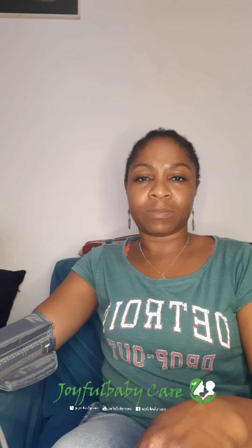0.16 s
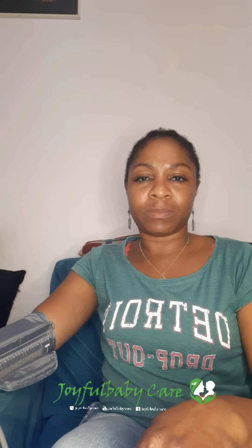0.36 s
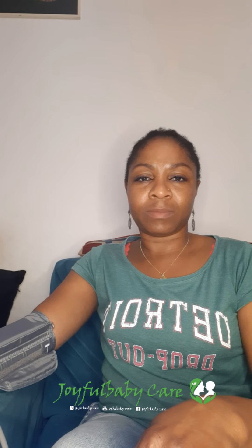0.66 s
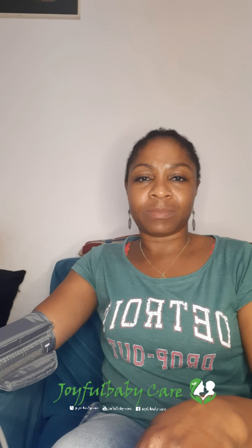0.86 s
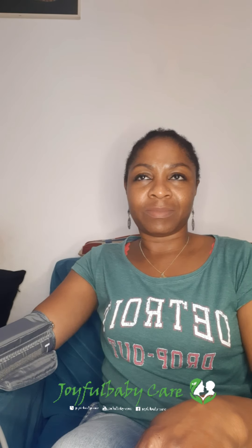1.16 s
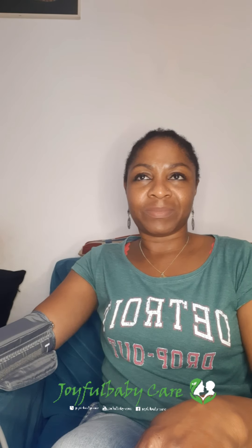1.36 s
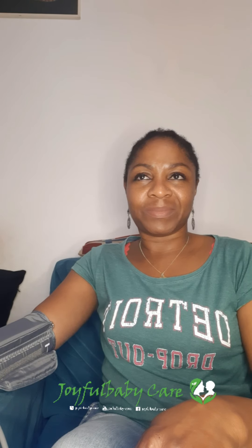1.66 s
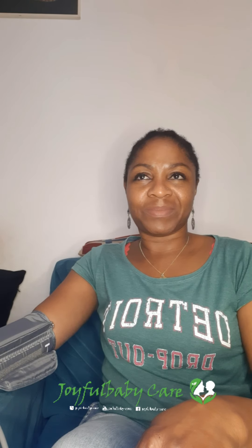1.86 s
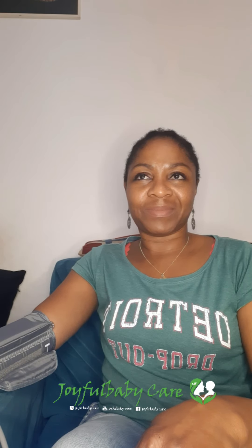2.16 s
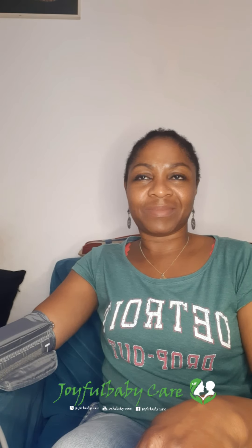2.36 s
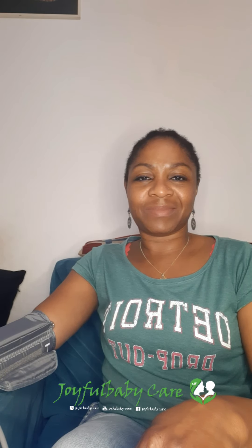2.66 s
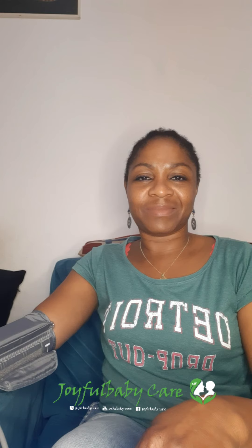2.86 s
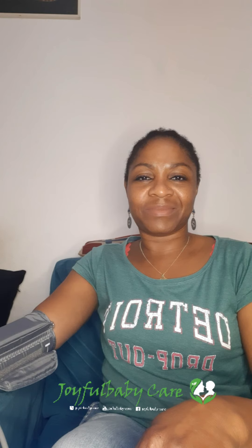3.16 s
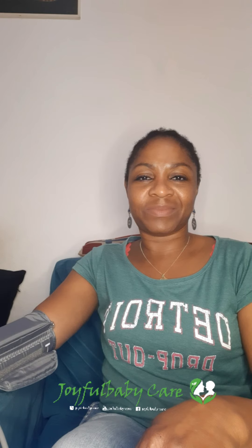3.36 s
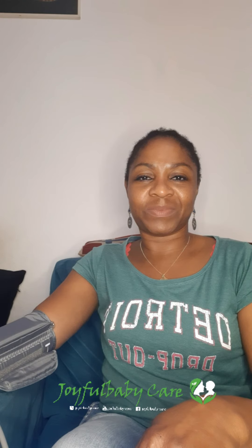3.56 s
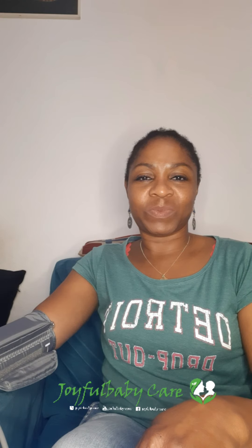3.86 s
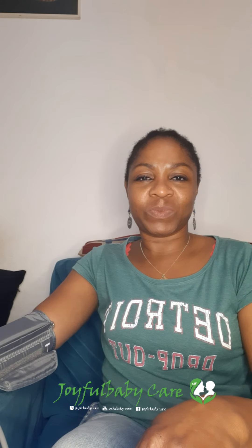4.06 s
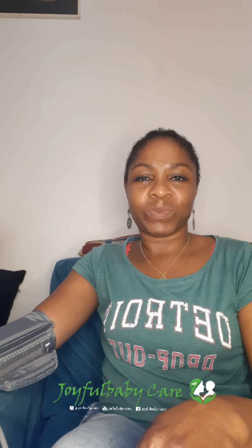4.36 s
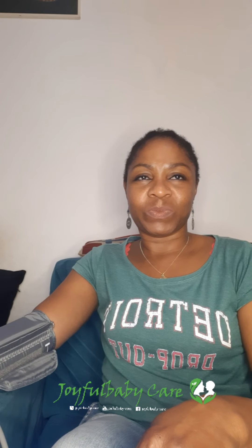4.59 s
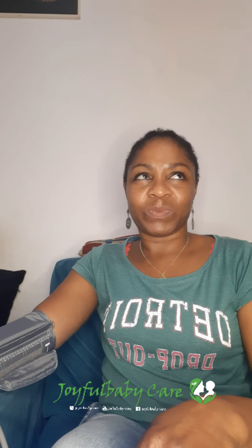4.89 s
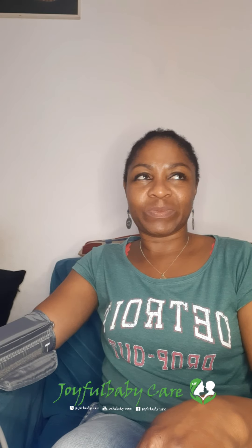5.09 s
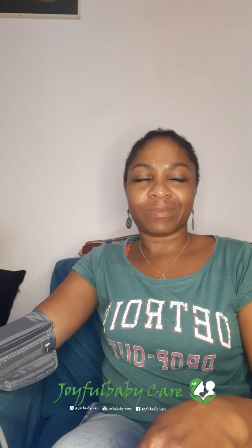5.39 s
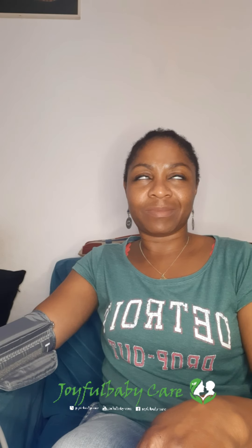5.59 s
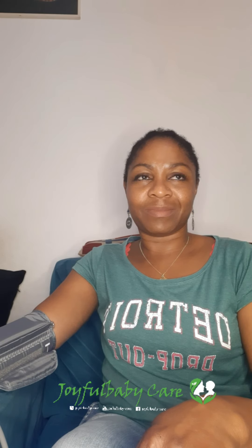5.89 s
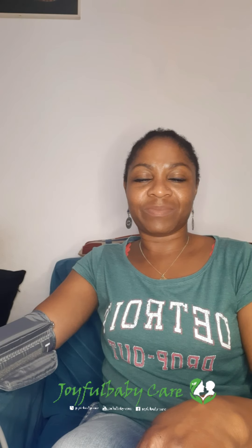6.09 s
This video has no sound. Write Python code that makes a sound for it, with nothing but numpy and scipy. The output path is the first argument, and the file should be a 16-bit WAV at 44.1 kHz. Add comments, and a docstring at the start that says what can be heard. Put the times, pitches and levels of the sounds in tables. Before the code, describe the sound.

A small air pump buzzes steadily close by, sagging slightly in pitch as a cuff fills, then cuts off with a valve knock into quiet room hiss.

```python
"""A quiet room: a small diaphragm air pump inflates an arm cuff close to the right microphone of a phone.
Hum orders, valve flap, brush ticks, bearing whine and hiss follow one shaft, which slows as pressure builds.
Then the power is cut, the pump runs down and a valve knocks; ringing noise bursts make all the small blows.
Coloured noise makes the room's rumble and hiss, which stay. The left microphone is shadowed by the phone
and hears the pump late."""
import sys
import numpy as np
from scipy import signal
from scipy.fft import rfft, irfft, next_fast_len
from scipy.io import wavfile
from scipy.ndimage import map_coordinates

SR = 44100
rng = np.random.default_rng(int(sys.argv[2]) if len(sys.argv) > 2 else 0)


def persist_wave(psi):
    """Save psi, clipped to +-1, as 16-bit WAV."""
    counts = np.round(np.clip(psi, -1, 1) * 32767).astype(np.int16)
    wavfile.write(sys.argv[1], SR, np.atleast_2d(counts).T)


def ratio(d):
    """dB to gain"""
    e = np.asarray(d, float) / 20
    return 10 ** e


N = 274743  # samples


def unit(x):
    """Scaled to rms 1."""
    return x / np.sqrt(np.mean(x ** 2) + 1e-20)


def along(points, hz, column=1):
    """Values of a table read on a log-frequency axis."""
    p = np.transpose(points)
    return np.interp(np.log(hz + 1), np.log(p[0] + 1), p[column])


def wobble(rate):
    """A smooth random curve, rate knots a second."""
    knots = rng.standard_normal(int(N * rate / SR) + 4)
    return map_coordinates(knots, [np.arange(N) * rate / SR])


def bumps(rows):
    """A sum of brief bell-shaped rises or dips (time [s], height, width [s])."""
    t = np.arange(N) / SR
    return sum(height * np.exp(-((t - s) / width) ** 2) for s, height, width in rows)


def filtered(x, response):
    """x times a complex response of frequency."""
    m = next_fast_len(N + SR // 2)
    return irfft(rfft(x, m) * response(np.fft.rfftfreq(m, 1 / SR)), m)[..., :N]


def modes(table):
    """Causal response of a set of resonances, neighbours in opposite sign."""
    def response(f):
        return sum((-1) ** k * ratio(db) * 1j * f * width / (centre ** 2 - f ** 2 + 1j * f * width)
                   for k, (centre, width, db) in enumerate(table))
    return response


# room noise at the two microphones: (frequency [Hz], left level [dB per Hz], right level [dB per Hz]);
# the lows keep only this shape, their level is set by rumble_db
ROOM_NOISE = [(29.81, -100, -102), (40.6, -106.5, -105), (56.6, -80, -80.5), (75, -88.5, -93),
              (100.5, -90, -88), (190, -104, -105), (626, -107, -103), (1018.7, -106, -103),
              (1341.2, -107, -100), (1710, -116, -113), (3366, -122, -121), (4763, -123, -120),
              (4910, -124, -107), (6140, -127, -111), (6200, -130, -121), (7570, -130, -115),
              (8440, -131, -133), (9940, -128, -126), (11370, -123, -116), (14100, -118, -110),
              (15700, -116, -112)]
# likeness of the noise at the two microphones: (frequency [Hz], correlation [-1 to 1])
LIKENESS = [(60, 0.98), (240, 0.85), (950, -0.26), (3770, -0.074), (15000, -0.046)]
# swells of the rumble: (time [s], rise [dB], width [s])
RUMBLE_SWELLS = [(2.1, 9, .06), (3.1, 7.5, 0.24), (4.2, 5.5, 0.17), (4.86, 4, 0.046), (5.2, 2.5, 0.24),
                 (5.93, 9, 0.052)]


def room():
    """Nearly steady hiss and a swelling rumble, alike at both microphones only in the bass."""
    def shares(f):
        angle = np.arccos(np.clip(along(LIKENESS, f), -1, 1)) / 2
        return np.array([np.cos(angle), np.sin(angle)])

    def colour(f):
        return ratio([along(ROOM_NOISE, f, column=1), along(ROOM_NOISE, f, column=2)]) * np.sqrt(SR / 2)

    mid, side = filtered(rng.standard_normal((2, N)), shares)
    air = filtered(np.array([mid + side, mid - side]), colour)
    low = filtered(air, lambda f: 1 / (1 + (f / 135) ** 8))
    _, drive_db, _ = shaft()
    # the rumble is 6.5 dB stronger while the pump runs
    rumble_db = -67.5 + 6.5 * ratio(drive_db) + bumps(RUMBLE_SWELLS) + 2.4 * wobble(6)
    hiss_swell = ratio(0.6 * wobble(2.5))
    return (air - low) * hiss_swell + ratio(rumble_db) * unit(low)


# how fast the room's answer dies: (frequency [Hz], t60 [s])
WALL_DECAY = [(200, 0.55), (1000, 0.67), (2500, 0.19), (12000, 0.024)]


def walls(x):
    """The room's answer, noise in which each frequency dies at its own speed, different on the two sides."""
    hz, t, z = signal.stft(rng.standard_normal((2, SR // 2)), SR, nperseg=256)
    decay = ratio(-60 * t / along(WALL_DECAY, hz)[:, None])
    tail = signal.istft(z * decay, SR, nperseg=256)[1]
    late = np.pad(x, (200, 0))  # samples until the walls answer
    return signal.fftconvolve(late[None], tail / np.linalg.norm(tail[0]), axes=1)[:, :N]


# blows of each kind: (time [s], peak level at the right microphone [dB])
VALVE = [(3.804, -45), (3.817, -39), (3.848, -46)]
FIZZ = [(1.51, -66), (2.681, -54)]
TICK = [(4.731, -55)]
BLIP = [(6.191, -64.5)]
# resonances of each kind, passed twice: (frequency [Hz], width per pass [Hz], level per pass [dB])
VALVE_RING = [(615, 110, 0), (1400, 1100, -12)]
FIZZ_RING = [(11800, 3400, 0)]
TICK_RING = [(1250, 1100, 0), (2550, 300, -1)]
BLIP_RING = [(980, 70, 0)]


def knocks():
    """Short decaying noise bursts, each kind ringing its own resonances."""
    # (blows, resonances, t60 of the burst [s], left level relative to right [dB])
    kinds = [(VALVE, VALVE_RING, 0.04, -9), (FIZZ, FIZZ_RING, 0.11, 3),
             (TICK, TICK_RING, 0.022, -11), (BLIP, BLIP_RING, 0.08, -5)]
    out = np.zeros((2, N + SR))
    t = np.arange(SR // 8) / SR
    hz = np.fft.rfftfreq(SR // 2, 1 / SR)
    for rows, ring, t60, left_db in kinds:
        for s, peak_db in rows:
            burst = ratio(-60 * t / t60) * rng.standard_normal(len(t))
            blow = irfft(rfft(burst, SR // 2) * modes(ring)(hz) ** 2)[:len(t)]
            gain = ratio(peak_db + np.array([[left_db], [0]]))
            out[:, round(s * SR):][:, :len(t)] += gain * blow / abs(blow).max()
    return out[:, :N]


# the load changes for a moment and the shaft spurts or dips: (time [s], gain [turns per s], width [s])
SPURTS = [(0.0, 0.4, 0.071), (.26, 0.42, 0.046), (.53, 0.32, 0.049), (.87, 0.21, 0.086),
          (1.22, -.25, 0.0405), (1.305, 0.97, .045), (1.9, 0.19, .1), (2.45, .3, .12), (2.75, .12, .3),
          (3.42, 0.28, 0.061), (3.66, 0.37, .05)]


def shaft():
    """Speed [turns per s], drive [dB] and cuff pressure (0 slack, 1 tight): the load slows the motor."""
    free_hz, loaded_hz, sag_s = 54.44, 49.11, 3.1  # turns per s, turns per s, time constant
    cut_s = 3.797  # the power is cut
    t = np.arange(N) / SR
    coast = np.maximum(t - cut_s, 0)
    speed = loaded_hz + (free_hz - loaded_hz) * np.exp(-t / sag_s) + bumps(SPURTS)
    speed = speed - 245 * coast  # braking, turns per s lost each second
    drive_db = -138 * coast - 2800 * coast ** 2
    pressure = np.minimum(t / cut_s, 1)
    return np.maximum(speed, 1), np.maximum(drive_db, -200), pressure


def strikes(turns, places, scatter_db):
    """Impulses at fixed places (share of a turn, level [dB]) of every turn, set between samples."""
    place, db = np.transpose(places)
    whole = np.arange(1, int(turns[-1]))[:, None]
    at = np.interp(whole + place, turns, np.arange(N)).ravel()
    size = ratio(db + scatter_db * rng.standard_normal((len(whole), len(place)))).ravel()
    # windowed sinc around each fractional sample
    taps = np.floor(at)[:, None] + np.arange(-7, 9)
    offset = taps - at[:, None]
    kernel = np.sinc(offset) * np.cos(offset * np.pi / 17) ** 2
    return np.bincount(taps.astype(int).ravel(), (kernel * size[:, None]).ravel(), N + 16)[:N]


# air and brush hiss, also the tilt of the whine: (frequency [Hz], level [dB per Hz])
HISS = [(120, -105), (240, -89), (400, -86), (800, -92), (1050, -90), (1450, -93), (1700, -97),
        (2900, -100), (3250, -106), (4900, -103), (7600, -105), (8200, -124), (8800, -128), (9300, -112),
        (11500, -103), (15600, -107)]


def air_hiss(turns):
    """Air and brush noise that puffs three times a turn."""
    puff = unit(1 + 0.16 * np.cos(2 * np.pi * 3 * (turns - 0.27)))
    return filtered(puff * rng.standard_normal(N), lambda f: ratio(along(HISS, f)) * np.sqrt(SR / 2))


# resonances of the motor can: (frequency [Hz], width [Hz], relative level [dB])
MOTOR_CAN = [(3190, 260, -24), (4010, 65, -0.5), (4900, 36, 2), (5120, 190, 0), (5710, 180, 2.5),
             (5960, 170, 0), (6260, 250, 1), (6960, 330, -5), (7620, 580, -2)]


def bearing_whine(turns):
    """The same small flaws of shaft and bearing pass on every turn: thin lines at high orders."""
    t = np.arange(N) / SR
    flaws = strikes(turns, rng.random((40, 2)) * [1, -6], scatter_db=1)
    ringing = filtered(flaws, lambda f: modes(MOTOR_CAN)(f) * ratio(along(HISS, f)) * (f > 2900))
    level_db = -64.5 - 0.16 * t + 1.4 * wobble(2.42)
    return ratio(level_db) * unit(ringing)


# three commutator segments, each with a make and a weaker break: (place [share of a turn], relative level [dB])
BRUSH = [(.03, -6), (.25, 0), (.38, -6), (.59, 0), (.7, -4), (.92, -2)]


def brush_ticks(turns):
    """Brushes make and break contact with the segments, a treble tick each time."""
    ticks = strikes(turns, BRUSH, scatter_db=1.5)
    ring = modes([(11400, 1200, 0)])
    return ratio(-71.5) * unit(filtered(ticks, lambda f: ring(f) ** 2 * (f > 9000)))


# the flap's slap and its rebounds: (place [share of a turn], relative level [dB])
FLAP = [(.052, 0), (.174, -7), (.456, -12), (.86, -10)]
# housing modes rung by the flap: (frequency [Hz], width [Hz], relative level [dB])
HOUSING = [(1762, 156, 0), (1981, 69, 7), (2160, 240, -4.5), (2466, 130, -3.5), (2556, 43, 6.5),
           (2676, 305, 5), (2962, 310, -6)]


def valve_flap(turns):
    """The flap slaps and rebounds on every turn and rings the housing."""
    slaps = strikes(turns, FLAP, scatter_db=0.5)
    return ratio(-56) * unit(filtered(slaps, lambda f: modes(HOUSING)(f) * (f > 1640)))


# hum orders before standing waves and waver:
# (multiple of the shaft, level with the cuff slack [dB], level with it tight [dB])
HUM = [(1, -61, -62), (2, -67, -64), (3, -58, -55), (4, -75, -79), (5, -59, -61), (6, -57, -50),
       (7, -58, -67), (8, -48, -59), (9, -61, -50), (10, -49, -61), (11, -57, -70), (12, -56, -60),
       (13, -59, -60), (14, -60, -54), (15, -51, -43), (16, -55, -67), (17, -60, -52), (18, -55, -61),
       (19, -51, -69), (20, -68, -62), (21, -54, -58), (22, -59, -58), (23, -58, -58), (24, -41, -68),
       (25, -60, -52), (26, -60, -60), (27, -53, -60), (28, -77, -44), (29, -75, -66), (30, -74, -67),
       (31, -66, -71), (32, -72, -69)]
# standing waves of the room that the orders slide across: (frequency [Hz], width [Hz], gain [dB])
STANDING = [(477, 8, -9.8), (513, 40, 10.5), (627, 24, 9.4), (756, 14, -16.4), (783, 8, -4.5),
            (828, 14, -14.3), (939, 40, -9.7), (1107, 24, -11.5), (1173, 14, -6.1), (1302, 24, -11.6),
            (1425, 14, -9.0), (1452, 40, -12.6), (1500, 40, 10.0), (1548, 40, 10.4)]


def order_lag(k):
    """Phase lag [turns of the order's own cycle] that shapes the pulse within a turn."""
    if k < 19:  # higher orders come later in the stroke, which spreads the pulse over the turn
        return 0.461 * k + 0.0535 * k * k
    # the upper orders bunch into three strokes a turn, the strongest as the valve opens near its end
    return 0.89 * k - 0.005 * (k - 25) ** 2 + 0.19 * np.sin(2 * np.pi * k / 3)


def shaft_hum(turns, speed, pressure):
    """Harmonics of the shaft, each sliding from its slack to its tight level and across standing waves."""
    t = np.arange(N) / SR
    step = slice(None, None, 256)  # standing-wave gain is worked out on a coarse grid
    hum = np.zeros(N)
    for k, slack_db, tight_db in HUM:
        f = k * speed[step]
        standing_db = sum(db / (1 + (2 * (f - centre) / width) ** 2) for centre, width, db in STANDING)
        standing = np.interp(t, t[step], ratio(standing_db))
        level_db = slack_db + (tight_db - slack_db) * pressure + 0.4 * wobble(3.03)
        wave = np.cos(2 * np.pi * (k * turns - order_lag(k)))
        hum += np.sqrt(2) * ratio(level_db) * standing * wave
    return hum


def pump():
    """Hum and rattle, locked to one shaft; the hum fades faster than the rest in the run-down."""
    speed, drive_db, pressure = shaft()
    turns = np.cumsum(speed) / SR
    hum = shaft_hum(turns, speed, pressure)
    rattle = valve_flap(turns) + brush_ticks(turns) + bearing_whine(turns) + air_hiss(turns)
    return ratio(1.12 * drive_db) * hum, ratio(drive_db) * rattle


# the phone shadows the left microphone: (frequency [Hz], gain [dB])
SHADOW = [(55, -21), (160, -13), (300, -7), (950, -11.5), (1500, -6.5), (1750, -14), (2600, -12.5),
          (3050, -21.5), (3800, -9.5), (4500, -27.5), (5500, -51), (7800, -42), (9000, -53), (15000, -7)]


def left_microphone(x):
    """The pump at the shadowed microphone: duller, and late by a path some 16 cm longer."""
    lag_s = 0.00046
    return filtered(x, lambda f: ratio(along(SHADOW, f)) * np.exp(-2j * np.pi * f * lag_s))


def scene():
    """The pump and the knocks, direct and off the walls, over the room."""
    hum, rattle = pump()
    blows = knocks()
    right, left = hum + rattle + walls(ratio(-21) * hum + ratio(-10) * rattle)
    echoes = ratio([[-20], [-12]]) * walls(blows[1])  # left, right
    return np.array([left_microphone(left), right]) + blows + echoes + room()


def top_cut(x):
    """Nothing passes above the cut-off."""
    return signal.sosfilt(signal.butter(12, 15750, fs=SR, output="sos"), x)


def record(dry):
    """The finished mix of both microphones, as the phone keeps it."""
    return top_cut(dry)


dry = scene()
out = record(dry)
persist_wave(out)
```